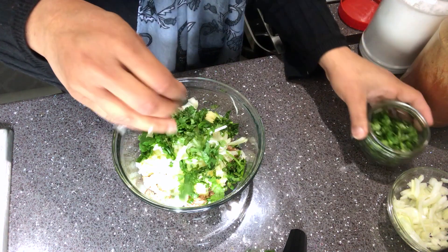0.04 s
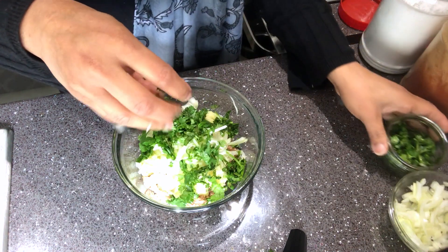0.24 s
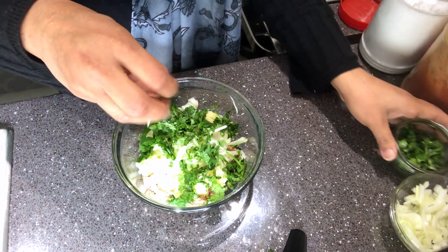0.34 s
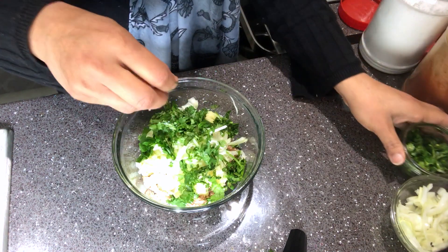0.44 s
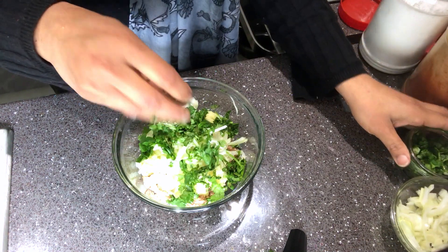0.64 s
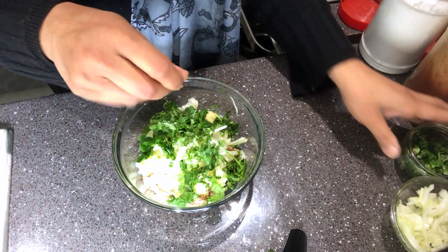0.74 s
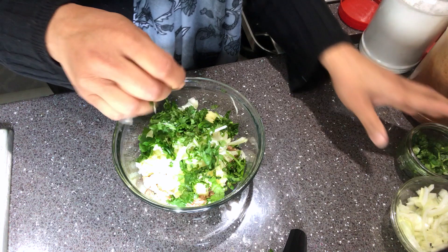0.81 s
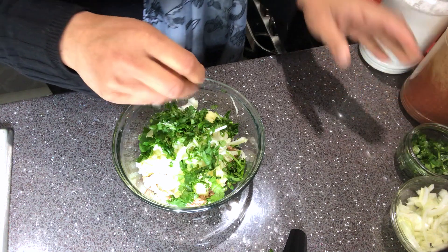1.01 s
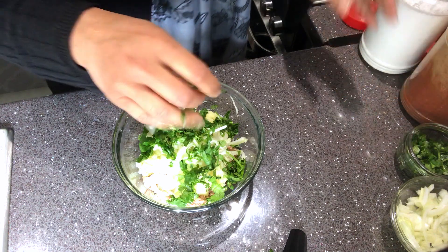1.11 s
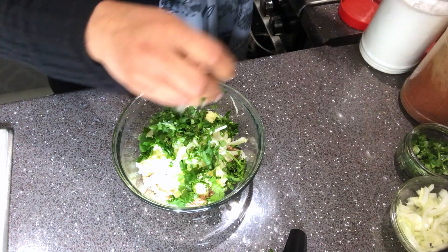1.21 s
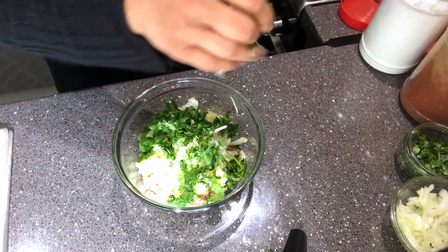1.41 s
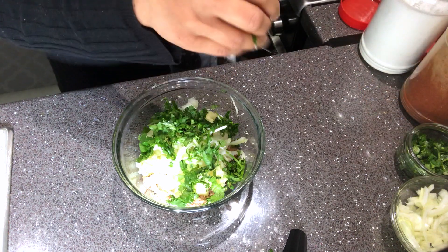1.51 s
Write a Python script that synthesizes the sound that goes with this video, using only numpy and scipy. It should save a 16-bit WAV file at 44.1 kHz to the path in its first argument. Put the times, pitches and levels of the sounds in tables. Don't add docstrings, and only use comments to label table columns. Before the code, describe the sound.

Close up in a small reflective kitchen, one sharp glass clink, a short knock on stone, then a firmer double-bouncing set-down of the bowl, followed by light dry ticks over soft room hum.

```python
import sys
import numpy as np
from scipy import signal
from scipy.fft import rfft, irfft
from scipy.io import wavfile
from scipy.ndimage import uniform_filter1d

SR = 44100
rng = np.random.default_rng(int(sys.argv[2]) if len(sys.argv) > 2 else 0)


def undo_db(level):
    steps = np.asarray(level, float) / 20
    return 10 ** steps


def unload_wav(signal):
    wavfile.write(
        sys.argv[1],
        SR,
        np.round(np.clip(np.atleast_2d(signal).T, -1, 1) * 32767).astype(np.int16),
    )


N = 68355

# start in seconds, small bowl level in dB, large bowl level in dB,
# best-struck pitch in Hz, reach around it in octaves.
GLASS_CONTACTS = [
    (0.21205, -24.5, -27, 4780, 2.36),
    (0.2061, -30, -28.5, 4275, 2.58),
    (0.2184, -30, -26, 7100, 4.89),
    (.3135, -34, -47.5, 3930, 1.096),
    (0.49, -44.5, -51, 5570, 0.345),
    (0.5577, -25.5, -67.5, 2883, 0.263),
    (0.5899, -35, -62, 5240, 0.336),
    (0.67, -37.5, -61.5, 2660, 0.23),
    (.5787, -50.5, -68, 12660, 0.32),
    (0.441, -48.5, -86, 15800, 0.154),
]
# start in seconds, level in dB, contact time in ms, crack level in dB.
COUNTER_KNOCKS = [(0.3081, -24, 0.155, -47.5), (0.5494, -32.5, 0.59, -28.5), (0.5521, -21, 0.243, -33.5),
                  (0.565, -24.5, 0.268, -61), (0.5692, -25.5, 0.29, -47.5), (0.58, -36, 0.51, -54.5),
                  (0.6799, -38.5, 0.329, -57), (0.6861, -27, 0.893, -64), (0.701, -35.5, 1.63, -61),
                  (0.7089, -34, 1.47, -66.5), (.805, -59.5, 0.62, -61), (.454, -36.5, 1.13, -65.5)]


def table(rows, hz):
    rows = np.array(rows)
    return np.interp(np.log(np.maximum(hz, 1)), np.log(rows[:, 0]), rows[:, 1])


def unit(x):
    return x / np.sqrt(np.mean(x ** 2))


def add(track, start_s, x):
    i = int(start_s * SR)
    track[i:i + len(x)] += x[:N - i]


def noise(gain):
    spectrum = rfft(rng.standard_normal(N))
    return unit(irfft(spectrum * gain(np.fft.rfftfreq(N, 1 / SR)), N))


def burst(hz, ms, width):
    t = np.arange(2048) / SR
    grain = rng.standard_normal(2048) * np.exp(-3 * t / (ms / 1000))
    edges = np.clip([hz / (1 + width), hz * (1 + width)], 50, .45 * SR)
    x = signal.sosfilt(signal.butter(2, edges, "band", fs=SR, output="sos"), grain)
    return x / np.abs(x).max()


def ring(modes, spread_db, best_hz=990.0, octaves=26.0):
    t = np.arange(SR // 2) / SR
    hz, db, t60 = np.array(modes).T[:, :, None]
    luck = rng.standard_normal((2,) + hz.shape)
    off_pitch = np.log2(hz / best_hz) / octaves
    gain = np.sign(luck[1]) * undo_db(db + spread_db * luck[0] - 5.2 * off_pitch ** 2)
    decay = 1000. ** (-t / np.maximum(t60, .005))
    return np.sum(gain * np.sin(2 * np.pi * hz * t) * decay, axis=0)


def air():
    # frequency in Hz, level in dB per Hz.
    air_colour = [(150, -32), (260, -2), (555, -7), (671, -7.5), (947, -9.5), (1030, -9), (1160, -11),
                  (16000, -27.5)]
    # centre in Hz, width in Hz, level in dB.
    hum_bands = [
        (50.35, 5.7, -60),
        (110.3, 74, -65.5),
        (191, 116, -68.5),
        (235, 11, -75.5),
        (11050, 400, -88),
    ]
    level_db, flicker_db = -64.5, .5
    steps = np.repeat(rng.standard_normal(N // 2048 + 1), 2048)[:N]
    flicker = unit(uniform_filter1d(steps, 2048))
    hiss = noise(lambda f: undo_db(table(air_colour, f)) * (f > 120))
    out = undo_db(level_db + flicker_db * flicker) * hiss
    for hz, width, db in hum_bands:
        out += undo_db(db) * noise(lambda f: 1 / (1 + ((f - hz) / (width / 2)) ** 4))
    return out


def kitchen(x):
    # frequency in Hz, decay time t60 in seconds (a negative value makes the band grow instead of
    room_t60 = [(150, -0.23), (500, 0.294), (1500, 0.2732), (4000, 0.2979), (8000, 0.131), (15000, -0.1028)]
    # frequency in Hz, send level in dB.
    room_send = [(150, -2), (500, -5.5), (1500, -1), (4000, -2.02), (8000, -1.5), (15000, -7.5)]
    onset_ms = 1.4
    late_db, late_stretch = -7.5, 2.144
    t, tail = np.arange(N) / SR, 0
    for hz in 100 * 2 ** np.arange(0, 7.6, .5):
        gone = -t / table(room_t60, hz)
        fade = 1000. ** gone + undo_db(late_db) * 1000. ** (gone / late_stretch)
        fade = fade * (1 - np.exp(-t / (onset_ms / 1000)))
        band = noise(lambda f: np.exp(-(np.log2((f + 1) / hz) / 0.386) ** 2))
        send = undo_db(table(room_send, hz)) * np.sqrt(hz / SR)
        tail = tail + band * fade / np.sqrt(np.sum(fade ** 2)) * send
    return signal.fftconvolve(x, tail)[:N]


def ticks():
    # start in seconds, level in dB, pitch in Hz, ring in ms.
    herb_ticks = [(0.037, -54, 4680, 3.4), (0.041, -48, 6500, 2.46), (.071, -59, 8100, 1.1),
                  (.095, -51.5, 5950, 3.7), (.117, -57, 2930, 1.9), (.0425, -48.5, 12800, 2.6),
                  (.0955, -51, 13500, 3.3), (.118, -64.5, 12060, 2), (.2065, -49.5, 2530, 4.66),
                  (.5652, -29, 6020, 3.5), (.5525, -46.5, 12610, 2.9), (.901, -57, 3100, 0.17),
                  (0.9009, -52.5, 6750, 0.68), (1.2699, -38.5, 6300, 5), (1.2705, -48, 12400, 4),
                  (1.283, -50, 5830, 7.3), (1.29, -45.5, 6500, 10.3), (1.3004, -41.5, 7640, 2.62),
                  (1.308, -49, 2778, 7.3), (1.3144, -46.5, 2917, 12)]
    rub_s, rub_length_s, rub_hz, rub_db = .515, 0.0117, 13500, -73.5
    out = noise(lambda f: np.exp(-((f - rub_hz) / 1500) ** 2)) * undo_db(rub_db)
    out *= np.exp(-((np.arange(N) / SR - rub_s) / rub_length_s) ** 2)
    for start_s, db, hz, ms in herb_ticks:
        add(out, start_s, undo_db(db) * burst(hz, ms, 0.21))
    return out


def counter():
    # mode in Hz, level in dB, decay time t60 in seconds.
    slab_modes = [(226.02, -28, 0.638), (242.2, -25.5, 0.847), (312.7, -21.5, 0.0735), (459, -8, 0.01425),
                  (528, -5, 0.0353), (560.1, -4.5, 0.0328), (692.3, -5, 0.0184), (1028.4, -3.5, 0.01787),
                  (1177.3, 0, 0.0192), (1353, -3, 0.0426), (1491.7, 0.5, 0.0239), (1827, 0, 0.0194),
                  (2395, -7.5, 0.0209), (3310, -8.5, 0.0047)]
    crack_hz, crack_ms = 6500, 2.806
    out = np.zeros(N)
    for start_s, db, contact_ms, crack_db in COUNTER_KNOCKS:
        phase = np.clip(np.arange(128) / SR / (contact_ms / 1000), 0, 1)
        push = np.sin(np.pi * phase) + 1e-9
        add(out, start_s, undo_db(db) * np.convolve(ring(slab_modes, 3.87), push / push.sum()))
        add(out, start_s, undo_db(crack_db) * burst(crack_hz, crack_ms, 0.617))
    return signal.sosfilt(signal.butter(2, 159.8, "high", fs=SR, output="sos"), out)


def bowls():
    rim_hz = [2650, 3795, 3897, 3932, 4100, 4285, 6750, 6945, 7170, 10540, 11950, 12300, 14632]
    # level in dB, decay time t60 in seconds.
    small_ring = [(-6.5, 0.14), (-2.5, .045), (1.5, 0.078), (-11, 0.18), (-3, 0.032), (-5, 0.051),
                  (0.5, 0.057), (-2.5, 0.07), (-13, 0.078), (-5, 0.086), (-3, 0.035), (-9.5, 0.033),
                  (-13, 0.21)]
    # mode in Hz, level in dB, decay time t60 in seconds.
    large_ring = [(319, -12, 0.09), (611, -1.5, 0.0254), (1175, -5.5, 0.0175), (1366, -2, 0.0141),
                  (1621.3, -3, 0.1203), (2285, 0.5, 0.016), (2878.2, 0.5, 0.02), (3475, -9.5, .02),
                  (4552, -9, .03), (5500, -2, 0.01637), (5900, -10.5, 0.026), (6320, -7.5, 0.054),
                  (7630, -7.5, 0.032), (8990, -29.5, 0.0099)]
    held_share = 0.443
    crack_db = 4.5
    out = np.zeros(N)
    for start_s, small_db, large_db, hz, reach in GLASS_CONTACTS:
        share = held_share if start_s > COUNTER_KNOCKS[0][0] else 1
        rim = np.column_stack([rim_hz, small_ring]) * [1, 1, share]
        small = undo_db(small_db) * ring(rim, .6, hz, reach)
        large = undo_db(large_db) * ring(large_ring, 2.76, hz, reach)
        add(out, start_s, small + large)
        add(out, start_s, undo_db(large_db + crack_db) * burst(2680, 9.3, 1.396))
    return out


def scene():
    duck_db, duck_release_s, open_db, tick_wet_db = -6, 0.551, 4.5, -5
    t = np.arange(N) / SR
    hits, small = bowls() + counter(), ticks()
    duck = np.zeros(N)
    for blow_s in (GLASS_CONTACTS[0][0], COUNTER_KNOCKS[2][0]):
        duck += duck_db * (t > blow_s) * np.exp(-np.maximum(t - blow_s, 0) / duck_release_s)
    floor = air() * undo_db(open_db + uniform_filter1d(duck, 441))
    reverb = kitchen(hits + undo_db(tick_wet_db) * small)
    return (hits + small + reverb + floor)[None]


def roll_off(x):
    return signal.sosfilt(signal.butter(12, 16880, fs=SR, output="sos"), x)


def record(dry):
    low = signal.butter(4, 39.64, "high", fs=SR, output="sos")
    top = signal.butter(8, 16300, fs=SR, output="sos")
    return roll_off(signal.sosfilt(np.vstack([low, top]), dry))


dry = scene()
out = record(dry)
unload_wav(out)
```